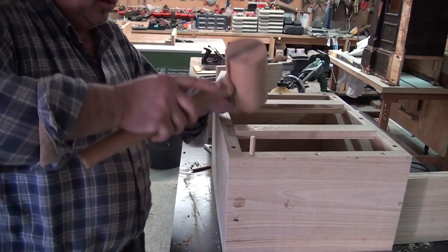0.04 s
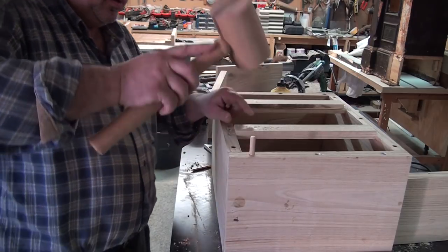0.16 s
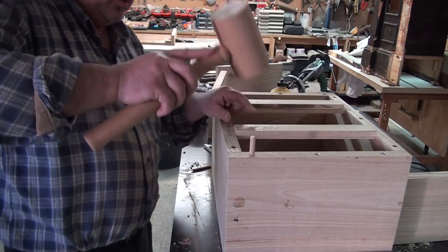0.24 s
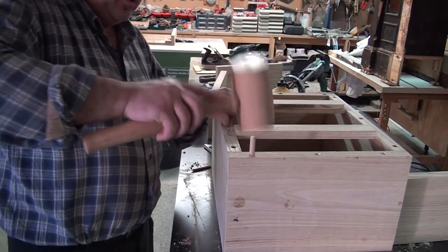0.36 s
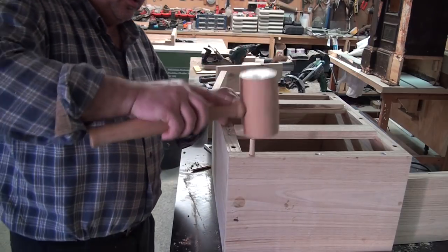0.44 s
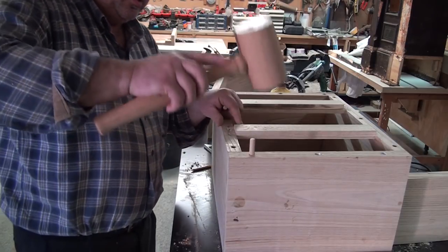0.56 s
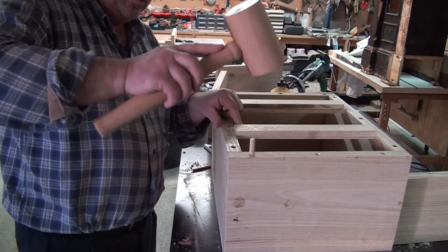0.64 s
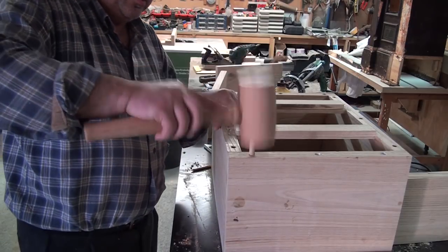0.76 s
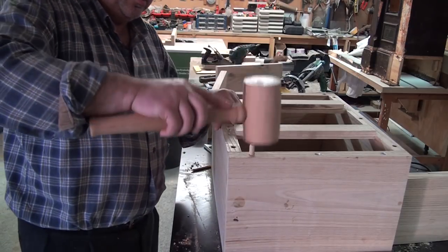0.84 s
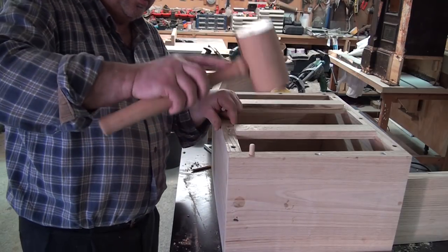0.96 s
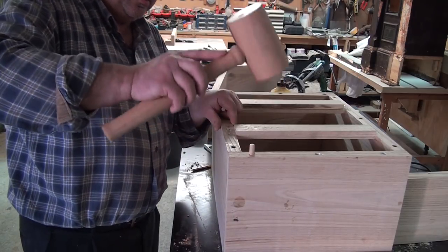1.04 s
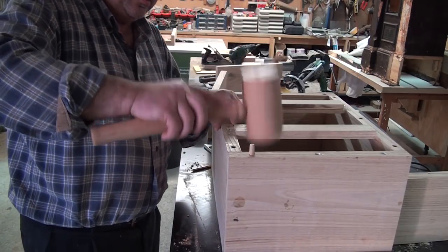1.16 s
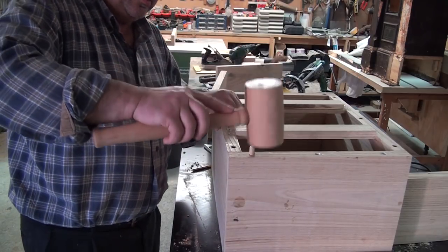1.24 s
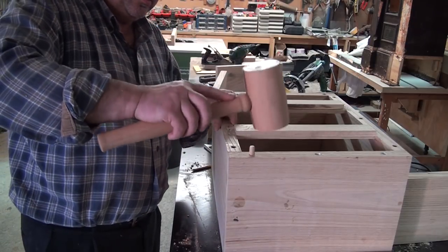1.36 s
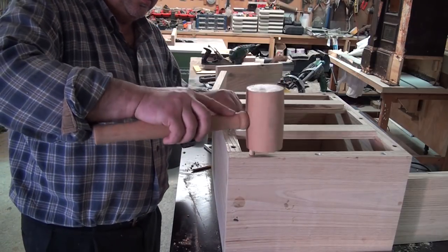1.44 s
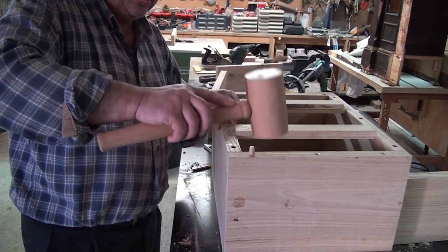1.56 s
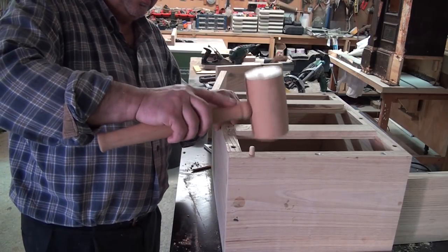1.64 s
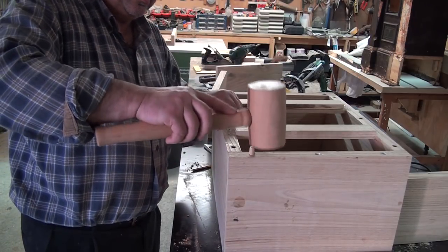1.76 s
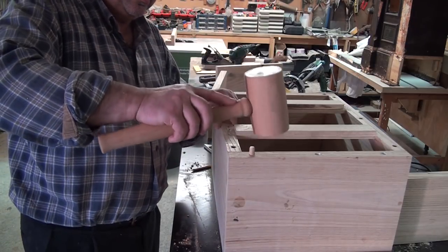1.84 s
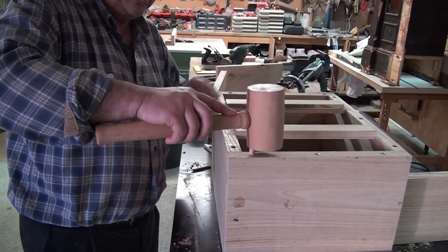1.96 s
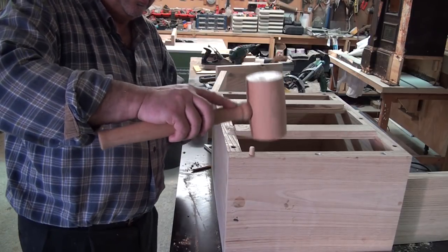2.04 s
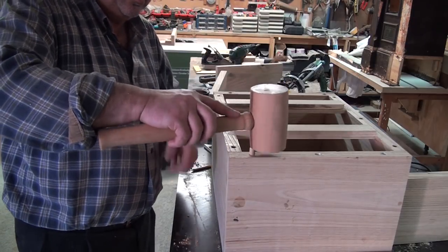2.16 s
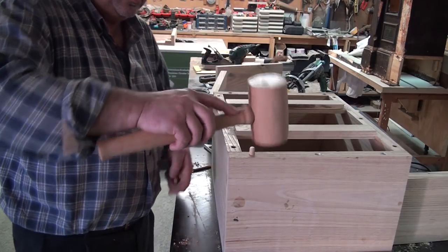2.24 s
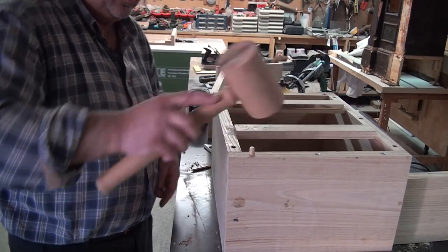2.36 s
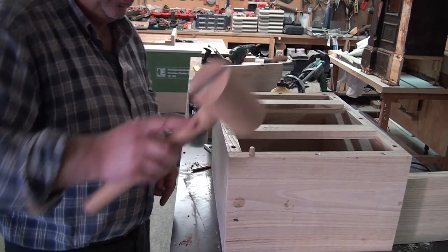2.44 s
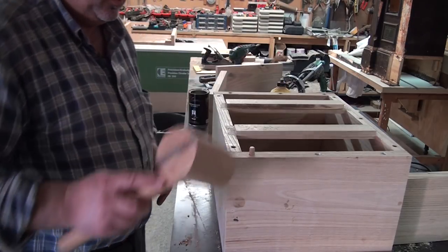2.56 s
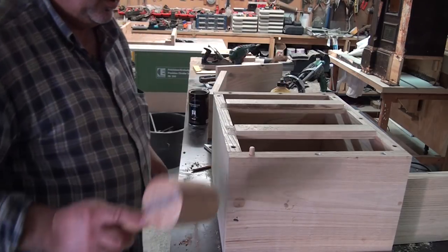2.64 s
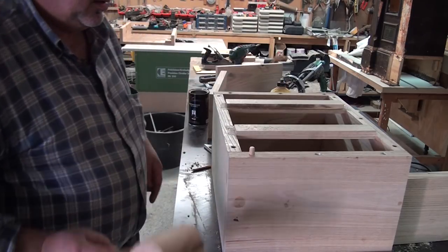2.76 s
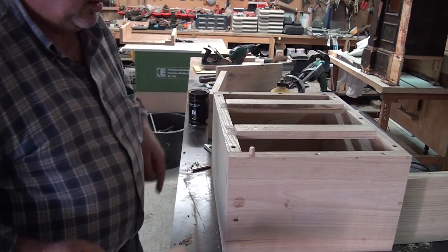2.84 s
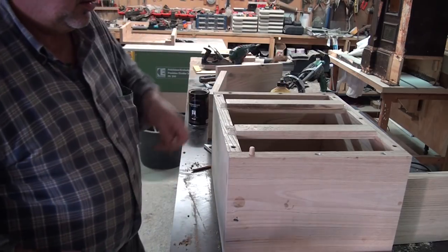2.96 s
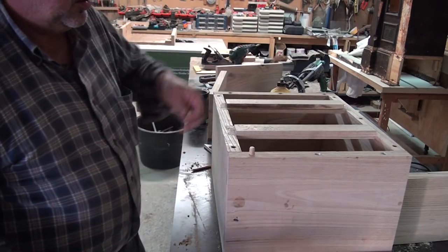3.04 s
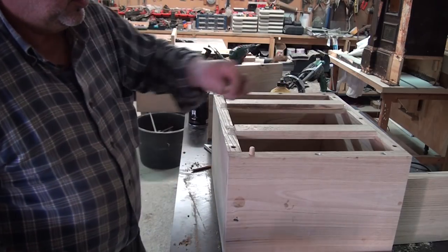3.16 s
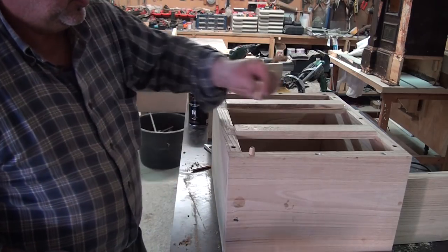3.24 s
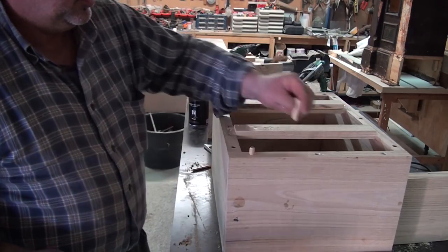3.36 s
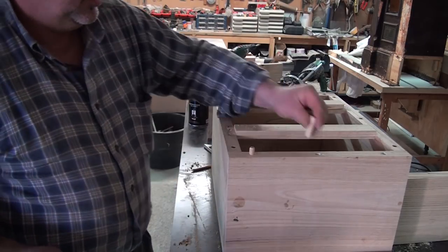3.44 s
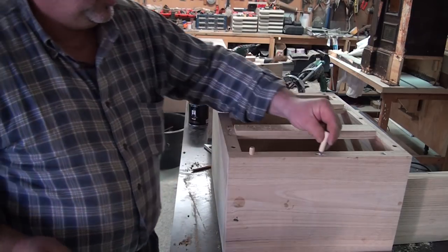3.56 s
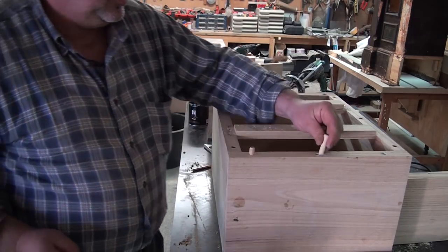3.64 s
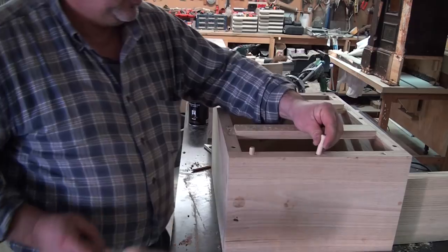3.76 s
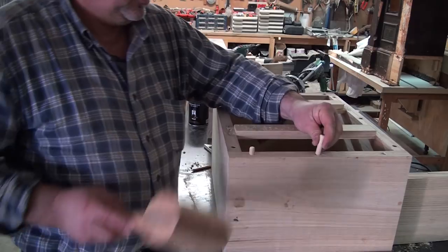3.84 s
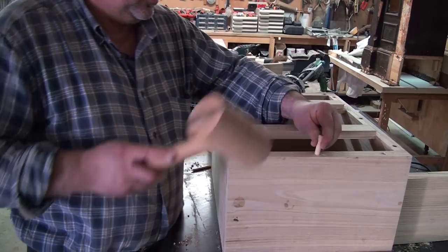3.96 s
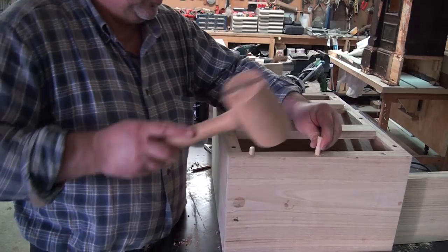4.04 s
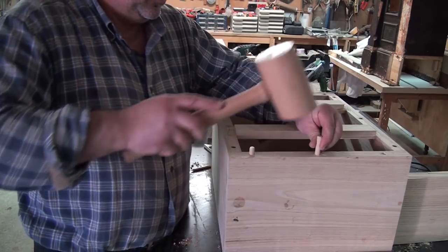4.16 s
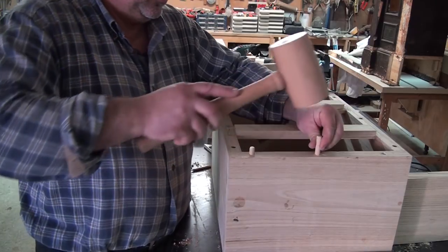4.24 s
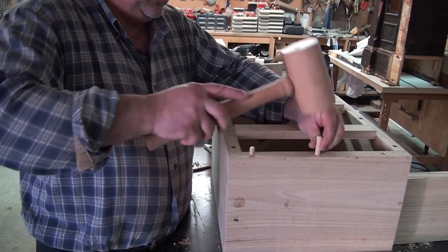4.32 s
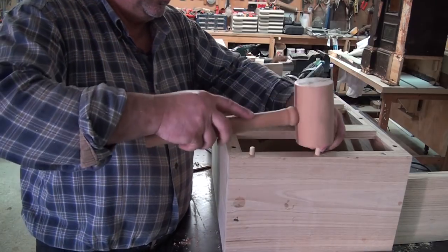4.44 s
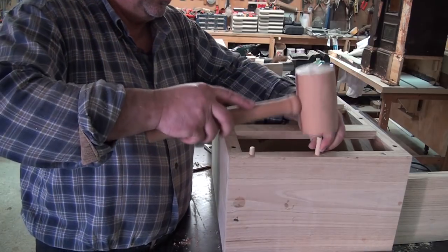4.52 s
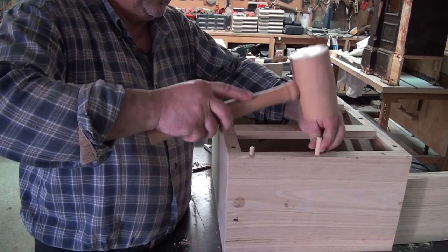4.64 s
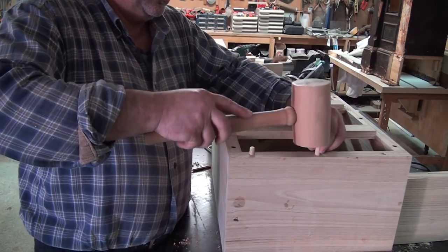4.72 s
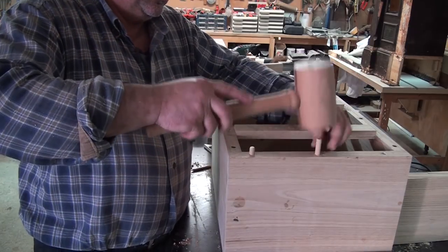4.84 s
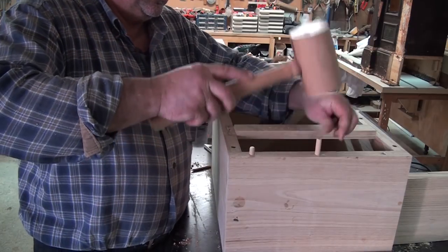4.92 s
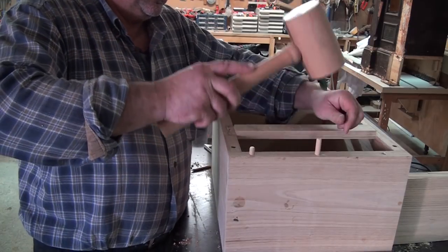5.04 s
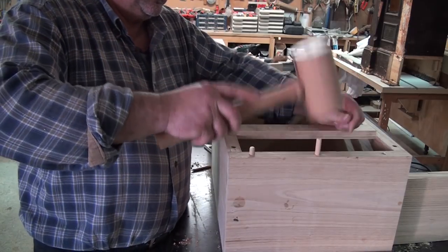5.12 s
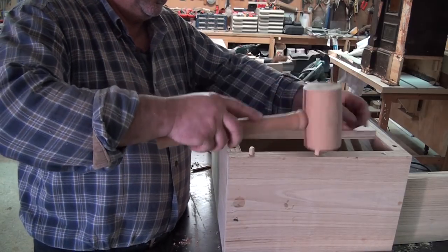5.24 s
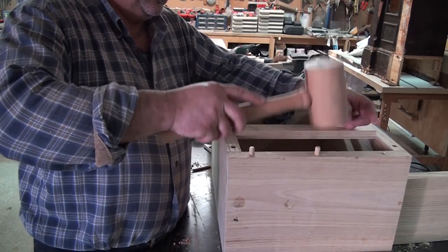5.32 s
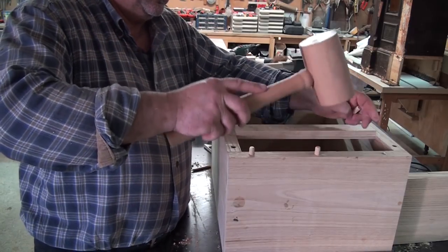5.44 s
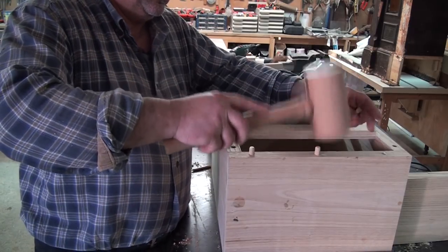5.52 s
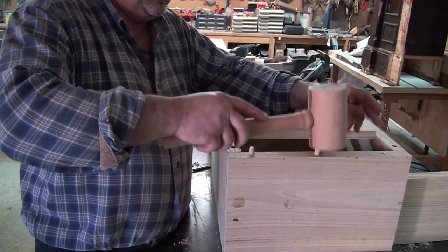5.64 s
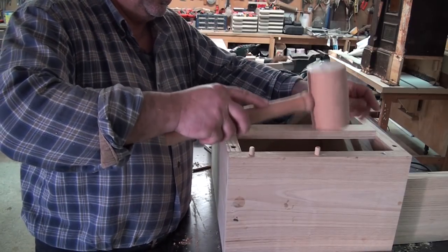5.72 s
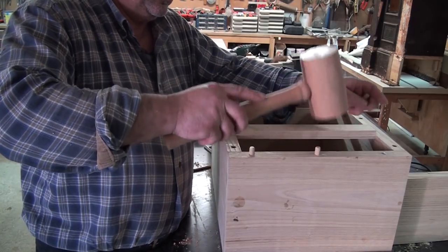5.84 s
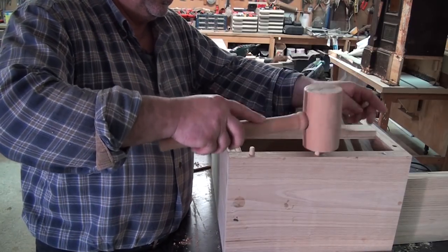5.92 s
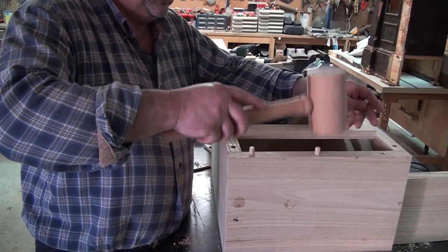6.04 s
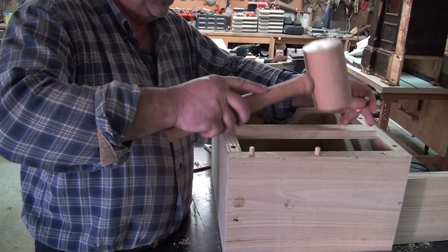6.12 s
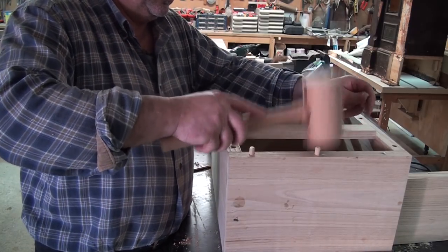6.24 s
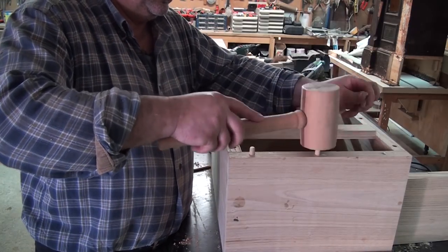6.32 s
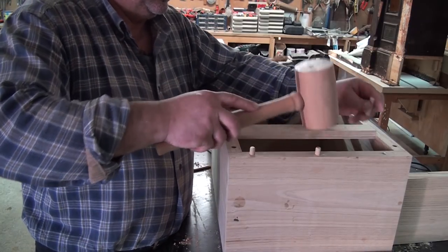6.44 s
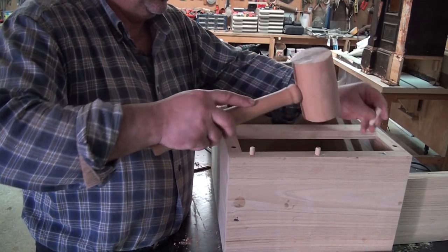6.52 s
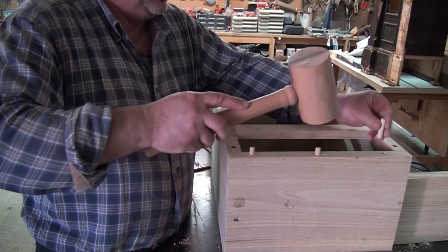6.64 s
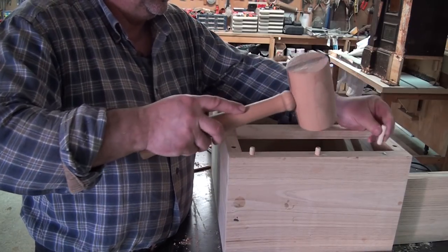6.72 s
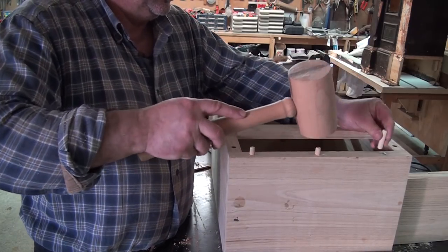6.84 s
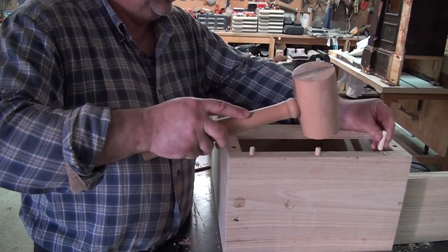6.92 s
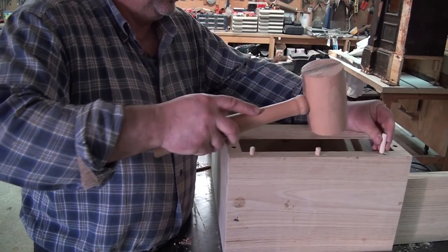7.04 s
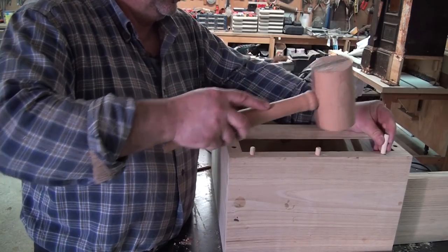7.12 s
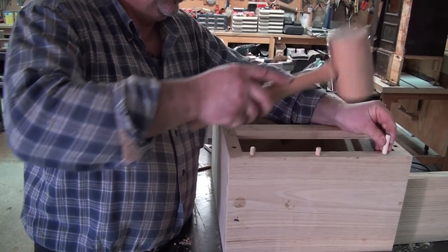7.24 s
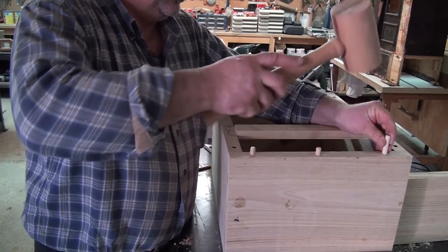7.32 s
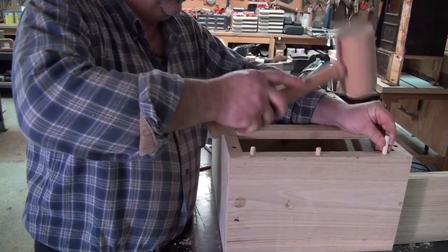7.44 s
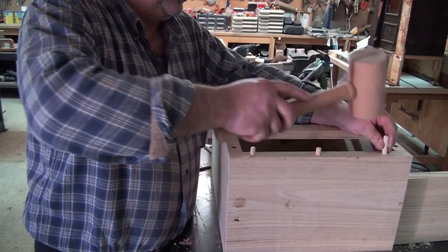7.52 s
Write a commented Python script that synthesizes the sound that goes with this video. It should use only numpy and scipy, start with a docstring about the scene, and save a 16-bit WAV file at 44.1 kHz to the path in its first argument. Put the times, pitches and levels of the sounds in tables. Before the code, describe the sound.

Two runs of close, sharp mallet knocks on wooden dowels grow hollow and boomy, with small clicks and a sleeve rustle between them.

```python
"""Bright clacks turn into hollow booms as a wooden mallet drives two dowels into the top of a wooden box.
A dowel that still slides gives the clack; once it is seated the blow goes into the box, whose panels boom.
Between the two groups of blows a hand fetches and sets the next dowel and a sleeve rustles, over quiet
workshop air. The limiter of a camera close by flattens the hard blows."""
import sys
import numpy as np
from scipy import signal
from scipy.fft import irfft
from scipy.io import wavfile
from scipy.ndimage import uniform_filter1d

SR = 44100
rng = np.random.default_rng(int(sys.argv[2]) if len(sys.argv) > 2 else 0)


def master_out(mix):
    """Clip the mix to full scale and print it as 16-bit PCM to the path in sys.argv[1]."""
    frames = np.transpose(np.atleast_2d(mix))
    ceiling = np.clip(frames, -1, 1)
    pcm = np.round(ceiling * 32767).astype(np.int16)
    wavfile.write(sys.argv[1], SR, pcm)


N = 334278
RING_SAMPLES = 32768
AGE = np.arange(RING_SAMPLES) / SR   # seconds since a contact

# contacts 0 to 3: which dowel is struck, and whether it still slides
CORNER_SLIDING, CORNER_SEATED, MIDDLE_SLIDING, MIDDLE_SEATED = range(4)
# kinds of light touch
BUMP, DOWEL_CLICK, FINGER_TICK, DOWEL_IN_HOLE, DOWEL_SCRATCH = range(5)
# clear modes of box and mallet: (frequency [Hz], level for contact 0, 1, 2, 3 [dB], t60 [s])
BOX_MODES = [(135, -38.5, -32.5, -38, -30.5, 0.73), (156.6, -31.5, -40, -36, -38, 0.3),
             (204.3, -28.5, -16.5, -32, -52, 0.27), (222.8, -23.5, -14.5, -36, -17.5, 0.45),
             (258.6, -34, -21, -36, -36, 0.48), (354.3, -33.5, -17.5, -31, -15.5, 0.49),
             (384, -37, -22, -33, -35, 0.19), (435, -57, -11, -45, -27, 0.09),
             (486, -25.5, -8, -31.5, -15, 0.25), (604, -62, -16.5, -30, -14.5, 0.34),
             (659.7, -52, -44, -33, -14, 0.22), (685.3, -22, -18, -26.5, -8, 0.25),
             (731.5, -50, -47, -35.5, -21, 0.53), (740, -78, -24, -31, -13, 0.28),
             (780, -36.5, -22.5, -36.5, -29, 0.52), (940, -49, -23.5, -50, -20, 0.26),
             (1035, -50, -27, -38.5, -18, 0.56), (1315, -35.5, -30, -43, -45, 0.39),
             (1820, -40, -30.5, -37, -31, 0.5), (1870, -38, -32, -41.5, -29, 0.49),
             (2296, -32, -35, -75, -41, 0.4), (2500, -34, -38, -43, -41, 0.62),
             (2743, -42, -41, -49.5, -36.5, 0.77), (2837, -51, -34.5, -51, -45, 0.75),
             (3003, -29.5, -36, -59, -39, 0.4), (4020, -59, -50, -55, -49, 0.91),
             (5000, -39, -42, -45.5, -46, 0.88), (5470, -45, -47, -46, -51, 0.83)]


def from_db(db):
    """Decibels to gain."""
    return 10 ** (np.asarray(db) / 20)


def rms_one(x):
    """Scale to rms 1."""
    return x / np.sqrt(np.mean(x ** 2) + 1e-20)


def at_hz(points, hz, column=1):
    """Read a table on a log-frequency axis."""
    table = np.array(points, float)
    return np.interp(np.log(hz + 1e-9), np.log(table[:, 0]), table[:, column])


def bins(size):
    """Frequencies of an FFT of this size."""
    return np.arange(size // 2 + 1) * SR / size


def dying(t60):
    """Exponential ring-out, 60 dB down after t60 seconds."""
    return np.exp(-np.log(1000) * AGE / t60)


def add(track, start_s, sound):
    """Mix a sound in at a time."""
    start = round(start_s * SR)
    track[:, start:start + sound.shape[-1]] += sound[..., :N - start]


def resonance(centre_hz, width_hz):
    """Response of one resonance, gain 1 at its peak."""
    hz = bins(RING_SAMPLES) + 1e-6
    return 1 / (1 + 1j * (hz ** 2 - centre_hz ** 2) / (hz * width_hz))


def butter(x, edge_hz, kind, order):
    """Plain high- or low-pass."""
    return signal.sosfilt(signal.butter(order, edge_hz, kind, fs=SR, output="sos"), x)


def flat_noise(size):
    """Spectrum of stereo noise with random phase: a flat mid, 0 dB per kHz, and a weaker side."""
    # stereo width of the reverberant sound: (frequency [Hz], side minus mid [dB])
    stereo_width = [(100, -21), (300, -16), (600, -14), (2000, -13.5), (5000, -12.5), (8000, -20.5),
                    (14000, -50)]
    mid, side = np.exp(2j * np.pi * rng.random((2, size // 2 + 1)))
    side = side * from_db(at_hz(stereo_width, bins(size)))
    return np.array([mid + side, mid - side]) * np.sqrt(size * SR / 2000)


def steady_noise(colour):
    """Stereo noise of a given colour, rms 1."""
    return rms_one(irfft(flat_noise(N) * from_db(at_hz(colour, bins(N))), N))


def workshop_air(level_db=-49.5):
    """The bed: steady, dark room tone."""
    # workshop background: (frequency [Hz], level [dB])
    air_colour = [(15, -43), (25, -5.5), (84, -4.5), (117, -2), (212, -9), (242, -2.5), (301, -9.5),
                  (344, -10), (840, -11.5), (1650, -15), (2910, -20.5), (4250, -21.5), (7110, -26.5),
                  (10100, -28), (16000, -35)]
    return from_db(level_db) * steady_noise(air_colour)


def swish(peak_s, peak_db, rise_s, fall_s, edge_db=10, roundness=1.6):
    """Gain of a slide that gathers speed and comes to rest: edge_db down one rise or fall from its peak."""
    since = np.arange(N) / SR - peak_s
    away = np.abs(since / np.where(since < 0, rise_s, fall_s))
    return from_db(peak_db - edge_db * np.minimum(away, 10) ** roundness)


def dowel_rub():
    """Dry wood turns on wood: a faint, narrow rasp at the dowel's own pitch."""
    # twists of the dowel in its hole: (peak time [s], peak level [dB], rise [s], fall [s])
    twists = [(3.84, -60, 0.071, .08), (4.1, -62, 0.087, .12), (7.55, -60, .06, .06)]
    # the rasp: (frequency [Hz], level [dB])
    rasp_colour = [(2200, -40), (2750, -3), (2920, 3), (3120, -26), (3800, -40)]
    return sum(swish(*twist) for twist in twists) * steady_noise(rasp_colour)


def sleeve(grain_db=1.0, panel_db=-11):
    """Cloth slides in many tiny catches, which make its hiss grainy and set a panel humming."""
    # one swish for each move of the arm: (peak time [s], peak level [dB], rise [s], fall [s])
    arm_moves = [(.005, -50, .02, 0.042), (.2, -51.5, 0.027, 0.099), (2.51, -56.5, 0.084, .3),
                 (2.95, -58, 0.054, 0.098), (3.105, -53, .02, 0.016), (3.655, -42, 0.15, 0.032),
                 (3.97, -49, 0.036, 0.05), (4.08, -58, .05, .11), (7.48, -59.5, 0.12, .25)]
    # hiss of the shirt sleeve: (frequency [Hz], level [dB])
    cloth_colour = [(400, -1.5), (1200, -6), (2500, -1.5), (2950, 7), (3500, -4), (5500, 2.5), (8500, 1.5),
                    (12000, -2), (16000, -14)]
    # hum of a faintly woken box panel: (frequency [Hz], level [dB])
    panel_colour = [(440, -70), (468, -6), (480, -1), (492, -4), (520, -70)]
    level = sum(swish(*move) for move in arm_moves)
    catches = rms_one(uniform_filter1d(rng.standard_normal(N), size=200))
    hiss = steady_noise(cloth_colour)
    hum = from_db(panel_db) * steady_noise(panel_colour)
    return level * from_db(grain_db * catches) * (hiss + hum)


def crack(tilt_db, scatter_db, length_s=.0032, scatter_t60=0.051, top_hz=10800):
    """Wood meets wood: each frequency arrives somewhere within a few ms, then near surfaces scatter it."""
    # heavily damped resonances of mallet head and dowel: (centre [Hz], width [Hz], level [dB])
    damped_modes = [(650, 310, -18), (1830, 110, 1.5), (2950, 170, 1), (4700, 620, 4.5), (5530, 300, 4),
                    (8370, 530, 1.5), (10040, 800, -4.5)]
    hz = bins(RING_SAMPLES)
    power = sum(np.abs(from_db(db) * resonance(centre, width)) ** 2 for centre, width, db in damped_modes)
    colour = np.sqrt(power) * from_db(tilt_db * np.log2(1 + hz / 1000))
    delay_s = length_s * np.interp(hz, np.linspace(0, SR / 2, 70), rng.random(size=70))
    burst = irfft(colour * np.exp(-2j * np.pi * np.cumsum(delay_s) * hz[1]))
    burst = burst / np.sqrt(np.sum(burst ** 2) / (length_s * SR))
    scatter = rms_one(irfft(flat_noise(RING_SAMPLES) * colour)) * dying(scatter_t60)
    return butter(burst * (AGE < 10 * length_s) + from_db(scatter_db) * scatter, top_hz, "low", order=3)


def handling(scatter_db=-17):
    """Fingers pick up a dowel and set it in its hole: each touch is a tick and a short, rough ring."""
    # light touches of hand and dowel: (time [s], kind, level [dB])
    touches = [(.044, BUMP, -36.5), (.058, BUMP, -30.5), (.778, DOWEL_SCRATCH, -44),
               (2.946, DOWEL_CLICK, -40), (2.990, DOWEL_CLICK, -46), (3.261, FINGER_TICK, -46.5),
               (3.301, FINGER_TICK, -42.5), (3.705, DOWEL_IN_HOLE, -44.5), (3.962, DOWEL_IN_HOLE, -43.5),
               (7.142, DOWEL_SCRATCH, -51), (7.176, DOWEL_SCRATCH, -52)]
    # voice of each kind: (tick tilt [dB/octave], ring over tick [dB], ring pitch [Hz], width [Hz], t60 [s])
    touch_sounds = [(-19, -7, 730, 730, 0.5), (14, 0.5, 2870, 270, 0.11), (-5, -7, 6500, 2800, .2),
                    (-15, -2.5, 670, 22, 0.23), (1, -9, 8500, 1500, .1)]
    out = np.zeros((2, N))
    for start_s, kind, level_db in touches:
        tilt_db, ring_db, ring_hz, width_hz, t60 = touch_sounds[kind]
        ring = rms_one(irfft(flat_noise(RING_SAMPLES) * resonance(ring_hz, width_hz))) * dying(t60)
        tick = crack(tilt_db, scatter_db)
        add(out, start_s, from_db(level_db) * (tick + from_db(ring_db) * ring))
    return out


def wood_colour(contact):
    """Timbre of the wood for one contact: level of its dense resonances over frequency, in dB."""
    # broad shape of the resonances: (frequency [Hz], level for contact 0, 1, 2, 3 [dB])
    wood_shape = [(46.3, -15, -22, -41, -24), (85.6, -22, -19, -23, -16.5), (155, -15.5, -12, -15.5, -12),
                  (227, -18, -5, -23, -8), (306, -22, -14, -22, -8), (487, -18.5, -4, -24, -5.5),
                  (675, -25.5, -8.5, -21, 1.5), (1050, -30, -14.5, -34.5, -14.5),
                  (1690, -21, -18, -36, -21), (2500, -24, -19.5, -30, -23.5),
                  (3880, -28.5, -30, -32.5, -32), (5140, -29, -29, -32, -30.5),
                  (9300, -32.5, -29.5, -40, -40), (15500, -49, -57, -56, -54)]
    # clusters of panel and mallet resonances: (centre [Hz], width [Hz], boost for contact 0, 1, 2, 3 [dB])
    clusters = [(578, 77, -1.5, -4.5, -7.5, -6), (702, 64, 4.5, 4, 2.5, 5), (1010, 93, 4.5, 1.5, 6, 7.5),
                (1347, 44, -9, -1, 7, 5), (1880, 260, -6.5, -1, 4.5, 4), (2120, 33, -8, -2.5, -6, -3),
                (2380, 230, 2.5, -3, -3.5, -5.5), (2883, 117, 7, 3, 4.5, 1),
                (3250, 340, -1.5, -1, -0.5, -1.5), (4870, 140, 1, 1, -1, -1),
                (6480, 1150, 2.5, -3.5, 0, -2.5), (9700, 1400, -0.5, -6, -1, 1.5)]
    hz = bins(RING_SAMPLES)
    humps = sum(boosts[contact] * np.exp(-((hz - centre) / width) ** 2)
                for centre, width, *boosts in clusters)
    return at_hz(wood_shape, hz, contact + 1) + humps


def dense_ring(spectrum, build_cycles=1.17):
    """Crowded resonances and reflections: each band builds over a few cycles and dies at its own rate."""
    # ring-out of box and workshop together: (frequency [Hz], t60 [s])
    decay_times = [(80, 0.58), (210, 0.48), (560, 0.51), (1470, 0.5), (3880, 0.42), (10200, 0.32),
                   (15000, 0.2)]
    centres = np.geomspace(60, 15000, 12)
    log_hz = np.log(bins(RING_SAMPLES) + 1)
    out = 0
    for hz, pick in zip(centres, np.eye(len(centres))):
        band = irfft(spectrum * np.interp(log_hz, np.log(centres), pick))
        build_up = 1 - np.exp(-AGE * hz / build_cycles)
        out = out + band * dying(at_hz(decay_times, hz)) * build_up
    return out


def clear_modes(build_cycles=2.8, blur_hz=1020):
    """One ring per mode: low ones are pure, high ones are close groups that beat roughly."""
    rings = []
    for hz, *_, t60 in BOX_MODES:
        width_hz = .3 + (hz / blur_hz) ** 3
        peak = np.exp(-.5 * ((bins(RING_SAMPLES) - hz) / width_hz) ** 2)
        group = irfft(flat_noise(RING_SAMPLES) * peak)
        envelope = dying(t60) * (1 - np.exp(-AGE * hz / build_cycles))
        envelope_rms = np.sqrt(np.mean(envelope ** 2))
        rings.append(rms_one(group * envelope) * envelope_rms)   # beating leaves the energy alone
    return np.array(rings)


def flattening(dip_db, recovery_s=0.039, damping_db_per_s=7, reference_dip_db=8):
    """Hard blows sound flattened: the boom is held down at first, comes up, then falls faster."""
    fall_db_per_s = damping_db_per_s * (dip_db / reference_dip_db) ** 2
    return from_db(-dip_db * np.exp(-AGE / recovery_s) - fall_db_per_s * AGE)


def mallet(alike=0.84, dense_db=-0.29, modes_db=-0.55, crack_db=-0.67, snap_db=4, snap_width_hz=750):
    """Each blow is a crack and a ring-out; force sets the ring's level and aim its hollow knock."""
    # mallet blows: (time [s], contact, force [dB], extra knock [dB], crack tilt [dB/octave],
    # opening dip of the ring-out [dB], pitch of the dowel's snap [Hz])
    blows = [(.4629, CORNER_SLIDING, -4, 1.5, 0.5, -0.5, 6000),
             (.8434, CORNER_SLIDING, 1, -1.5, 9, 3.5, 5570), (1.262, CORNER_SLIDING, 1, -1.5, 0.5, 3, 5200),
             (1.5161, CORNER_SLIDING, 0.5, 1.5, -3.5, -0.5, 5000),
             (1.761, CORNER_SEATED, 2, -4, 1.5, 6, 5060), (1.9961, CORNER_SEATED, 2.5, -1.5, 2, 9, 5000),
             (2.2198, CORNER_SEATED, 2, 1, 5.5, 8.5, 4370),
             (4.4964, MIDDLE_SLIDING, -9.5, 10.5, -5, -2, 4630),
             (4.7856, MIDDLE_SLIDING, 0, -6, 2, 0, 5900), (5.2388, MIDDLE_SLIDING, 3, -.5, -1.5, 5.5, 4060),
             (5.6291, MIDDLE_SEATED, 6, -5, -2, 12, 4700),
             (5.9877, MIDDLE_SEATED, 4.5, -2, 16.5, 10.5, 8700),
             (6.336, MIDDLE_SEATED, 13, -3.5, 15.5, 19, 8550)]
    # the crack of each contact: (level [dB], scatter [dB])
    cracks = [(-12.5, -6), (-14.5, -11), (-15.5, -3.5), (-18.5, -5.5)]
    # band of the hollow knock: (lower edge [Hz], centre [Hz], upper edge [Hz])
    knock_band = [337, 770, 1900]
    out, hz, modes = np.zeros((2, N)), bins(RING_SAMPLES), np.array(BOX_MODES)
    responses = [(flat_noise(RING_SAMPLES), clear_modes()) for _ in cracks]
    for start_s, contact, force_db, knock_db, tilt_db, dip_db, snap_hz in blows:
        usual, rings = responses[contact]
        drive = list(zip(knock_band, (force_db, force_db + knock_db, force_db)))
        # blows on the same contact wake nearly the same response
        response = np.sqrt(alike) * usual + np.sqrt(1 - alike) * flat_noise(RING_SAMPLES)
        snap_lift_db = snap_db * np.exp(-((hz - snap_hz) / snap_width_hz) ** 2)
        colour_db = dense_db + wood_colour(contact) + at_hz(drive, hz) + snap_lift_db
        dense = dense_ring(response * from_db(colour_db))
        mode_gains = from_db(modes_db + modes[:, contact + 1] + at_hz(drive, modes[:, 0]))
        clear = np.tensordot(mode_gains, rings, 1)
        add(out, start_s, flattening(dip_db) * (dense + clear))
        attack_db, scatter_db = cracks[contact]
        add(out, start_s, from_db(attack_db + crack_db) * crack(tilt_db, scatter_db))
    return butter(out, edge_hz=92, kind="high", order=3)   # the blows carry no deep bass


def scene():
    """Mallet, hands and the quiet workshop."""
    return mallet() + handling() + sleeve() + workshop_air() + dowel_rub()


def limiter(x, threshold_db=-3.0, release_db_per_s=70, attack_s=0.00019):
    """Peaks over the threshold pull the gain down at once; it recovers steadily."""
    peak_db = 20 * np.log10(np.abs(x).max(axis=0) + 1e-9)
    over_db = np.maximum(peak_db - threshold_db, 0)
    release_db = release_db_per_s * np.arange(N) / SR
    held_db = np.maximum.accumulate(over_db + release_db) - release_db
    pole = np.exp(-1 / (attack_s * SR))
    return x * from_db(-signal.lfilter([1 - pole], [1, -pole], held_db))


def record(dry):
    """The camera limits, rounds off what slips through and cuts the top."""
    ceiling, cutoff_hz = .76, 16200
    limited = limiter(dry)
    rounded = limited / (1 + (limited / ceiling) ** 8) ** (1 / 8)
    return signal.sosfilt(signal.ellip(10, .1, 80, cutoff_hz, fs=SR, output="sos"), rounded)


dry = scene()
out = record(dry)
master_out(out)
```